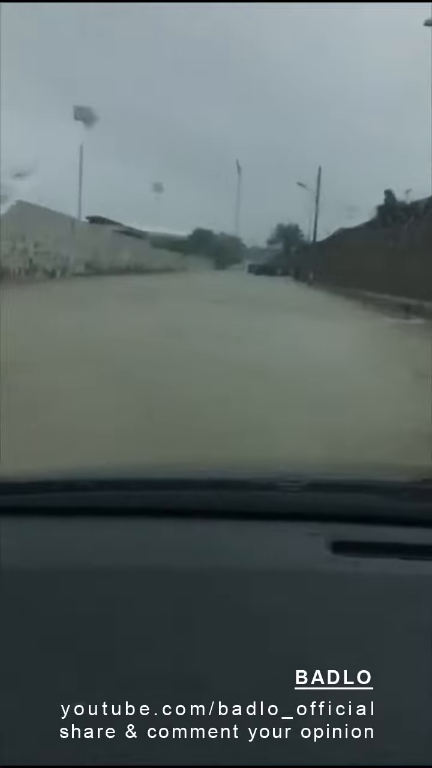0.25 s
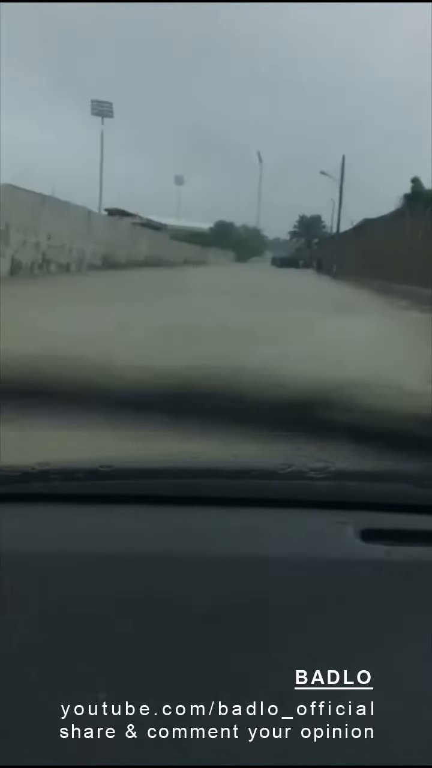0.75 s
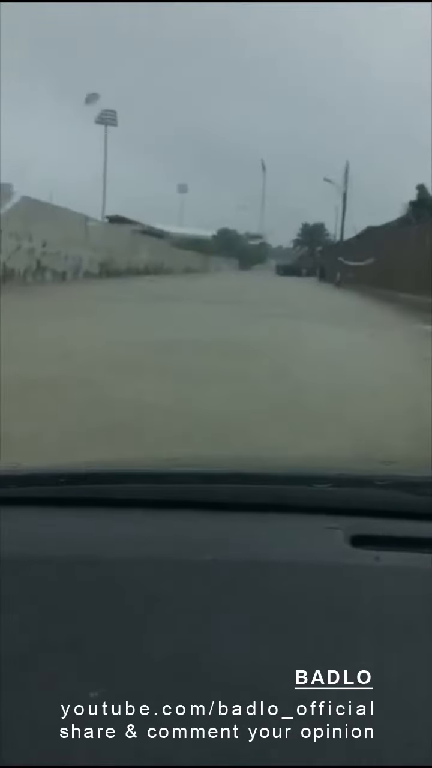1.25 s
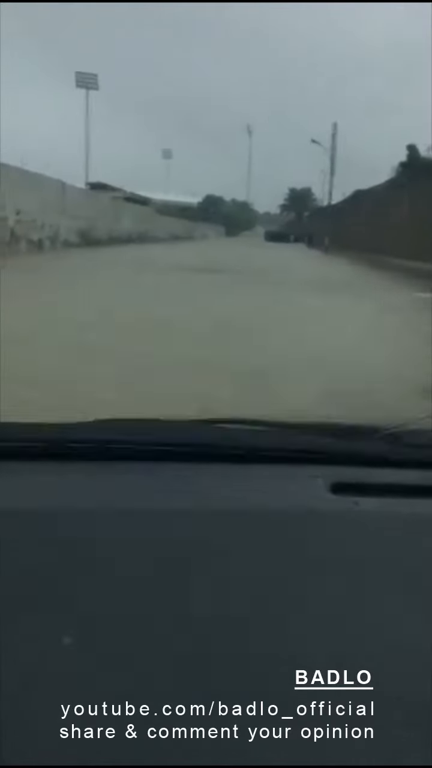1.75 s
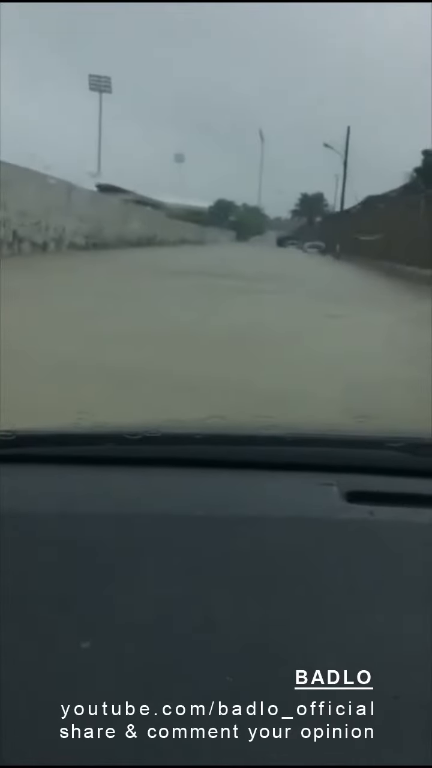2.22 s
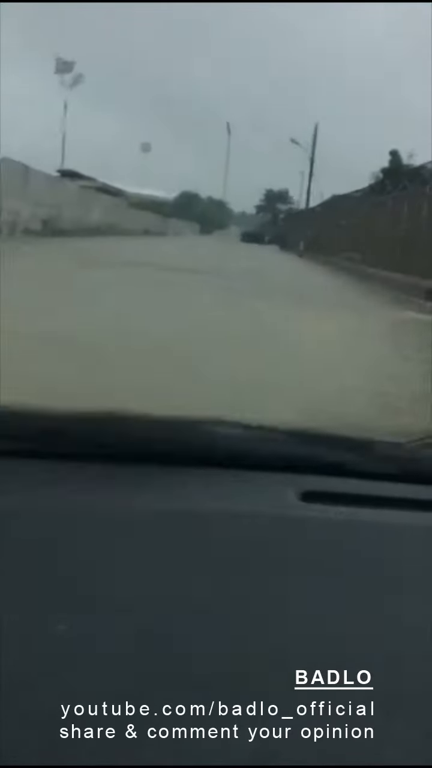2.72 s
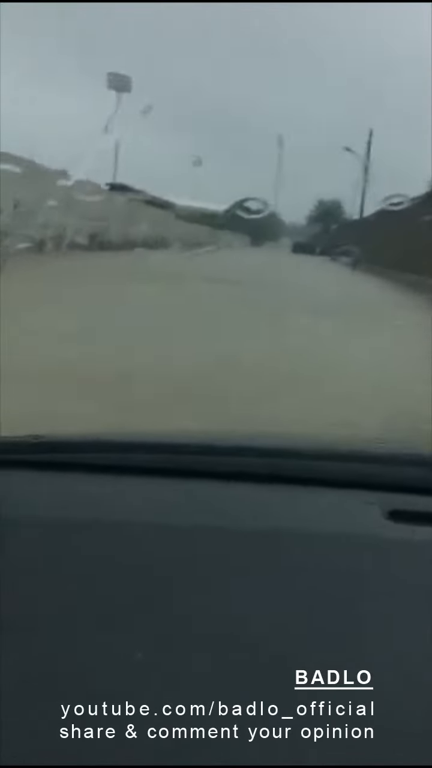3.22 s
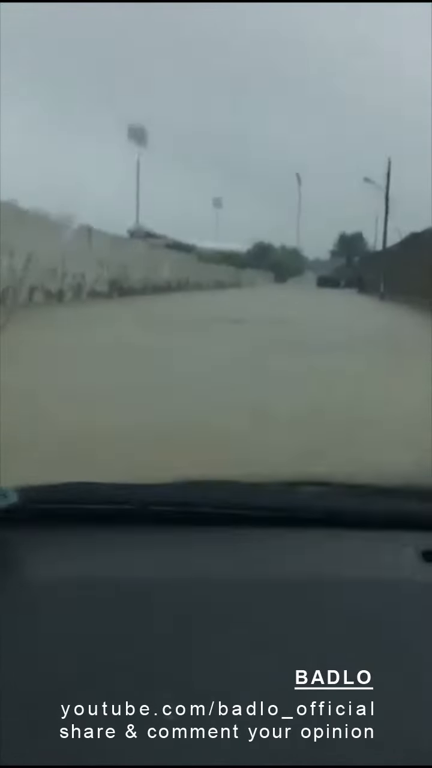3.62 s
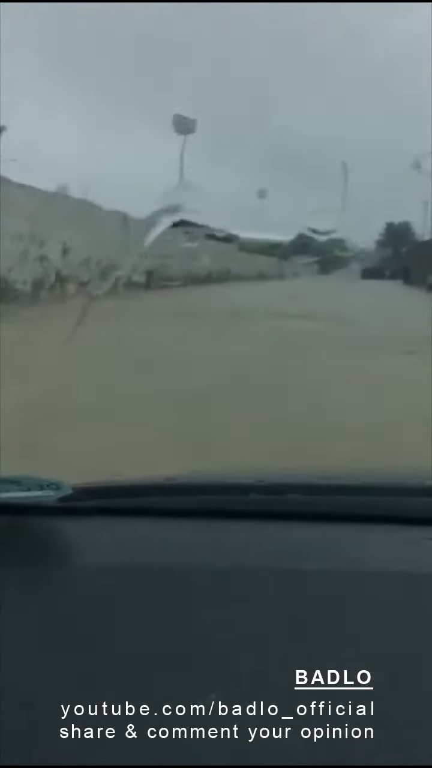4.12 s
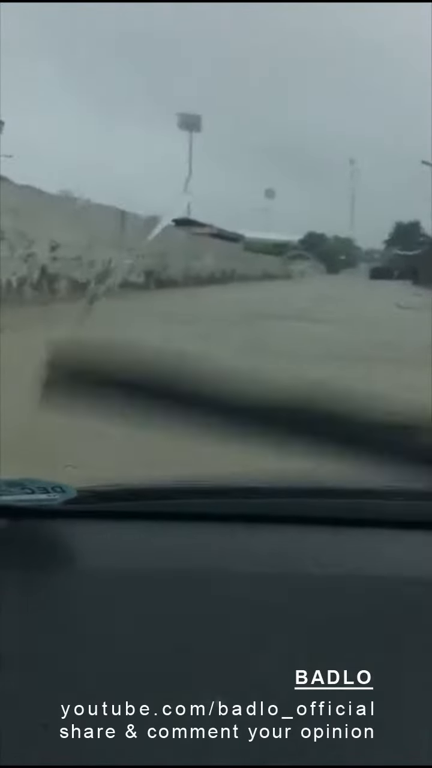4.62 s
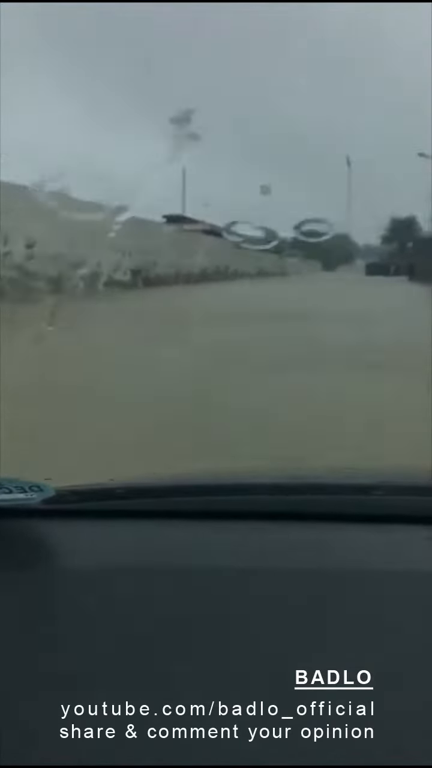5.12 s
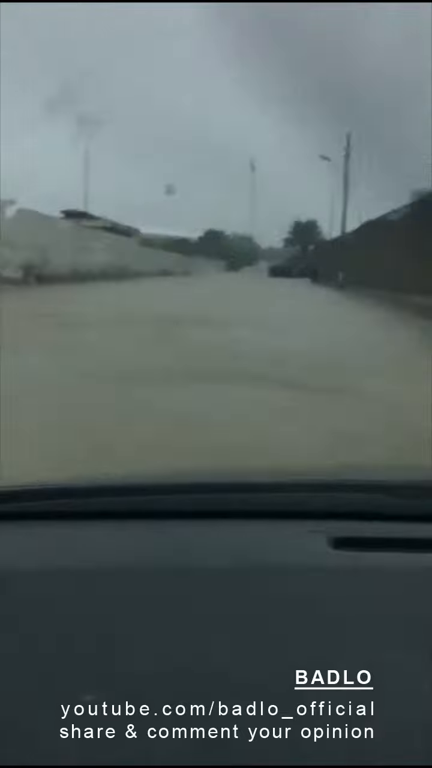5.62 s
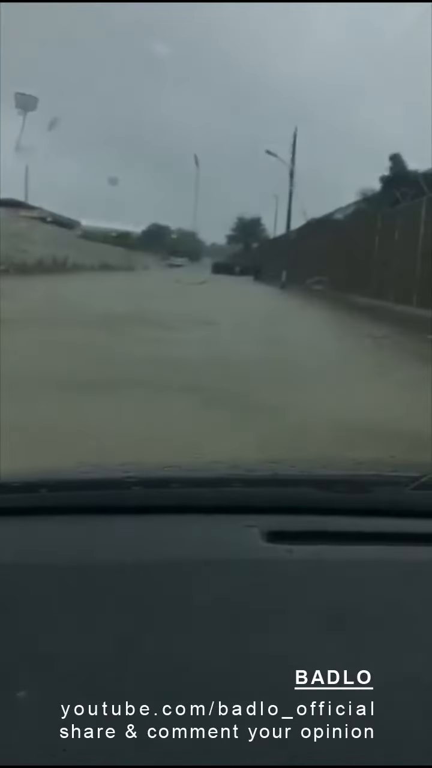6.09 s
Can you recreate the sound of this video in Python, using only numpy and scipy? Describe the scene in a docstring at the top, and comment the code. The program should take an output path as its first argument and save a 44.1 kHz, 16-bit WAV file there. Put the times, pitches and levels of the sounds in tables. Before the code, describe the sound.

Inside a car wading through floodwater: deep throbbing engine drone, rumbling, churning water, and wipers knocking and thudding about once a second in the rain.

```python
"""Inside a car that wades slowly along a flooded street in the rain.
The engine drones as a modulated harmonic tone that throbs unevenly, booms up and falls away.
Coloured noise and ringing bubbles make the water that rumbles, churns and hisses.
Short tones make low gulps of water and one bright snap; noise bursts make splashes and swells of the churn.
The wipers swish as narrow-band noise, then knock and thud as decaying modes; rain patters and ticks on the windscreen."""
import sys
import numpy as np
from scipy import signal
from scipy.fft import rfft, irfft
from scipy.io import wavfile
from scipy.ndimage import uniform_filter1d

SR = 44100
rng = np.random.default_rng(int(sys.argv[2]) if len(sys.argv) > 2 else 0)


def store_pcm(level_fs):
    """Save levels as 16-bit WAV."""
    pcm = np.round(np.clip(level_fs, -1, 1) * 32767).astype(np.int16)
    wavfile.write(sys.argv[1], SR, np.atleast_2d(pcm).T)


N = 280035
TIME = np.arange(N) / SR


def gain_of(db):
    """Decibel law: 20 dB is a factor of ten in amplitude."""
    return 10 ** (np.asarray(db) / 20)


def evened(x):
    """Normalisation to an rms of 1."""
    return x / np.sqrt(np.mean(x ** 2) + 1e-20)


def read(points, hz):
    """Interpolation of a spectrum on a logarithmic frequency axis."""
    point_hz, db = np.transpose(points)
    return np.interp(np.log(hz + 1), np.log(point_hz + 1), db)


def curve(rows):
    """Linear interpolation of a level over time."""
    return np.interp(TIME, *np.transpose(rows))


def hump(crest_s, half_s):
    """Raised-cosine envelope: 1 at the crest, 0 beyond the half-length."""
    return np.cos(np.pi / 2 * np.clip((TIME - crest_s) / half_s, -1, 1)) ** 2


def add(mix, start_s, sound):
    """Superposition of one event on the mix."""
    part = mix[max(round(start_s * SR), 0):][:len(sound)]
    part += sound[:len(part)]


def coloured(x, points):
    """Linear filtering: weights the spectrum of x by the points, at rms 1."""
    hz = np.fft.rfftfreq(len(x), 1 / SR)
    return evened(irfft(rfft(x) * gain_of(read(points, hz)), len(x)))


def wander(rate_hz):
    """Low-passed noise: a random fluctuation of rms 1 that fades out around the rate."""
    hz = np.fft.rfftfreq(N, 1 / SR)
    return evened(irfft(rfft(rng.standard_normal(N)) * np.exp(-(hz / rate_hz) ** 2), N))


def resonate(x, hz, width_hz):
    """Resonance by heterodyning: shift hz down to zero, low-pass, shift back, for a gain of about 1."""
    turn = np.exp(2j * np.pi * np.cumsum(hz * np.ones(len(x))) / SR)
    r = np.exp(-np.pi * width_hz / SR)
    return 2 * (turn * signal.lfilter([1 - r], [1, -r], x / turn)).real


def fuzzy_tone(hz, width_hz, size):
    """Narrow-band noise: white noise passed twice through one resonance, at rms 1."""
    once = resonate(rng.standard_normal(size), hz, width_hz)
    return evened(resonate(once, hz, width_hz))


def froth(points, patchy_db):
    """Time-frequency modulation: noise whose loudness shifts in short patches of time and pitch."""
    z = signal.stft(rng.standard_normal(N), nperseg=1024, noverlap=768)[2]
    patches = uniform_filter1d(rng.standard_normal(z.shape), size=6, axis=0)
    patches = uniform_filter1d(patches, size=9, axis=1)
    noise = signal.istft(z * gain_of(patchy_db * evened(patches)), nperseg=1024, noverlap=768)[1]
    return coloured(noise[:N], points)


def impacts(per_s, spread_db):
    """Random point process: clicks of either sign, most small and a few large."""
    size = gain_of(spread_db * np.minimum(rng.exponential(1, N), 4))
    return size * rng.choice([-1, 1], N) * (rng.random(N) < per_s / SR)


def bubbles(low_hz, high_hz, per_s, cycles, rise, count=24):
    """Bubble resonance: air pockets ring for a few cycles and rise in pitch as they surface."""
    out = np.zeros(N)
    for hz in np.geomspace(low_hz, high_hz, count):
        u = np.arange(int(5 * cycles * SR / hz)) * hz / SR / cycles  # time in units of the decay
        ring = np.sin(2 * np.pi * cycles * (u + rise * u ** 2))
        ring = ring * np.exp(-u) * np.minimum(u * cycles, 1)
        out += signal.oaconvolve(impacts(per_s / count, spread_db=3.5), ring)[:N]
    return out


# fine patter on the windscreen, relative spectrum: frequency_hz, density_db (dB per Hz)
GLASS_SPECTRUM = [(700, -21), (1800, 8), (2800, 3.5), (3800, 9.5), (5000, -2.5), (6500, -3), (8000, -11.5)]
# heavy drops and spatters, relative spectrum: frequency_hz, density_db (dB per Hz)
SNAP_SPECTRUM = [(700, -15), (1500, -3.5), (2200, 5), (2800, 8.5), (3800, 3.5), (5000, 0), (6500, 1.5),
                 (8000, -7)]
# water thrown on the windscreen: start_s, level_db, length_s
SPATTERS = [(0.655, -48.5, 0.046), (0.714, -56, 0.07), (3.66, -55.5, 0.2)]


def rain(patter_db=-62.5, ring_s=0.0028, grain_db=0.0):
    """Shot noise: random impacts shape fine patter, with spatters thrown over it, damped by the windscreen."""
    t = np.arange(SR // 3) / SR
    fall = np.exp(-t / ring_s)
    power = signal.oaconvolve(impacts(per_s=260, spread_db=4) ** 2, fall ** 2)[:N]
    envelope = np.sqrt(abs(power / power.mean()))
    patter = gain_of(patter_db) * envelope * coloured(rng.standard_normal(N), GLASS_SPECTRUM)
    thrown = np.zeros(N)
    for start_s, level_db, length_s in SPATTERS:
        add(thrown, start_s, gain_of(level_db) * np.exp(-(t / length_s) ** 3))
    grains = gain_of(grain_db * wander(400)) * rng.standard_normal(N)
    return patter + thrown * coloured(grains, SNAP_SPECTRUM)


# heavy drops on the windscreen: start_s, level_db
DROPS = [(.659, -42), (.675, -42), (.682, -41), (.95, -43), (.998, -41), (1.4144, -42), (1.655, -41),
         (1.928, -42), (2.49, -36.5)]


def drops(ring_s=0.0015):
    """Impulsive excitation: each heavy drop snaps as coloured noise that decays at once."""
    out, t = np.zeros(N), np.arange(SR // 40) / SR
    for start_s, level_db in DROPS:
        snap = np.exp(-t / ring_s) * coloured(rng.standard_normal(len(t)), SNAP_SPECTRUM)
        add(out, start_s - .0005, gain_of(level_db) * snap)
    return out


# scuttle panel that carries the wipers, its modes: frequency_hz, level_db (before tilt), t60_s
SCUTTLE_MODES = [(129.3, -5, 0.13), (186, -6.5, 0.11), (214, -5, 0.06), (358, -21.5, 0.03)]


def thud(soft_s, tilt_db):
    """Modal synthesis: a rubber-cushioned blow rings the scuttle; positive tilt favours its upper modes."""
    t = np.arange(SR // 4) / SR
    ring = np.zeros(len(t))
    for hz, level_db, t60_s in SCUTTLE_MODES:
        tilted_db = level_db + tilt_db * np.log2(hz / SCUTTLE_MODES[0][0])
        ring += gain_of(tilted_db - 60 * t / t60_s) * np.sin(2 * np.pi * hz * t)
    ring *= 1 - np.exp(-(t / soft_s) ** 2)
    return ring / abs(ring).max()


# wiper turns: centre_s, level_db (of the rub)
WIPES = [(0.028, -45), (.928, -45), (1.836, -44), (2.768, -43), (3.677, -48.5), (4.595, -43.5),
         (5.508, -46)]
# the wiper linkage thuds and rebounds: start_s, level_db (peak), tilt_db (dB per octave)
THUDS = [(0.065, -20.5, 3), (0.926, -20.5, -15), (1.841, -15, -24), (1.9, -21, 9.5), (2.764, -22, -18),
         (2.825, -21, 6), (3.658, -20.5, 6), (3.685, -18, -14), (4.662, -20.5, 2.5), (5.514, -16, -12),
         (5.589, -25, 11)]
SWISH_HZ, SWISH_S = 860, 0.023  # pitch at the centre and half-length of the rub at each turn


def wipers(glide_per_s=2.1, width_hz=190, upper_db=-8, chatter=0.67, scrape_db=-4):
    """Stick-slip friction: the blades rub with rising pitch, chatter and scrape; the linkage thuds."""
    out, t = np.zeros(N), np.arange(-SR // 10, SR // 10) / SR
    pitch = SWISH_HZ * (1 + glide_per_s * t)
    stroke = np.exp(-.5 * (t / SWISH_S) ** 2)
    scrape_stroke = np.exp(-.5 * ((t + 0.0082) / (2.2 * SWISH_S)) ** 2)  # longer, crests a little earlier
    for centre_s, level_db in WIPES:
        rub = fuzzy_tone(pitch, width_hz, size=len(t))
        rub = rub + gain_of(upper_db) * fuzzy_tone(pitch * 1.3, 220, size=len(t))
        slips = 1 + chatter * np.sin(2 * np.pi * (62 * t + rng.random()))  # rubber sticks and lets go
        swish = evened(rub * slips * stroke) * np.sqrt(np.mean(stroke ** 2))
        scrape = gain_of(scrape_db) * fuzzy_tone(510, 800, size=len(t)) * scrape_stroke
        heard = centre_s + t >= 0
        add(out, centre_s + t[0], gain_of(level_db) * (swish + scrape)[heard])
    for start_s, level_db, tilt_db in THUDS:
        add(out, start_s, gain_of(level_db) * thud(soft_s=0.013, tilt_db=tilt_db))
    return out


# the blades knock on the glass, often in quick succession: start_s, level_db (peak), pitch_hz
KNOCKS = [(.03, -42, 896), (.911, -34.5, 773), (0.937, -37, 913), (1.817, -30, 824), (1.838, -38, 900),
          (2.755, -34, 850), (2.763, -32.5, 865), (2.777, -36, 804), (3.655, -34, 870), (3.679, -36, 800),
          (4.566, -35, 917), (4.589, -34, 850), (4.596, -28.5, 850), (5.5, -36, 894), (5.511, -33, 910)]
# ring of blade and arm: ratio (multiple of the pitch), level_db, t60_s
BLADE_MODES = [(.46, -4.5, 0.05), (.78, -10, .04), (1, -1.5, 0.06), (1.349, -12.5, .05)]


def blades(soft_s=.0027, rough=.06, slip_hz=220):
    """Modal ringing with frequency modulation: blades knock, roughened by the wet rubber slipping."""
    out, t = np.zeros(N), np.arange(SR // 10) / SR
    slip = wander(slip_hz)
    for start_s, level_db, pitch_hz in KNOCKS:
        slip_here = slip[round(start_s * SR):][:len(t)]
        turns = np.cumsum(pitch_hz * (1 + rough * slip_here)) / SR
        ring = np.zeros(len(t))
        for ratio, mode_db, t60_s in BLADE_MODES:
            mode = np.sin(2 * np.pi * (ratio * turns + rng.random()))
            ring += gain_of(mode_db - 60 * t / t60_s) * mode
        ring *= 1 - np.exp(-(t / soft_s) ** 2)
        add(out, start_s, gain_of(level_db) * ring / abs(ring).max())
    return out


# splashes and short swells of the churning water:
# start_s, level_db (at the crest), pitch_hz, length_s (pi times the rise to the crest)
SPLASHES = [(.04, -43.5, 378, 0.031), (.658, -44.5, 1590, 0.024), (0.687, -45, 2200, 0.012),
            (.925, -44.5, 328, .08), (1.13, -42, 291, 0.046), (1.397, -47.5, 2020, 0.043),
            (1.425, -33.5, 180, 0.17), (1.465, -46, 586, .05), (3.085, -46.5, 550, 0.065),
            (3.267, -46, 720, 0.011), (3.65, -42, 560, .1), (4.08, -43, 328, 0.047), (4.63, -28, 157, 0.11),
            (4.74, -31, 122, .12), (5.063, -45, 910, .041), (5.08, -40.5, 310, 0.057),
            (5.545, -42, 408, 0.083), (6.04, -40.5, 377, 0.086), (6.133, -46, 1890, .028),
            (6.199, -39, 340, 0.058)]


def splashes(width=0.38):
    """Narrow-band noise bursts: splashes and short swells of the churning water, each around its own pitch."""
    out, t = np.zeros(N), np.arange(SR // 4) / SR
    for start_s, level_db, pitch_hz, length_s in SPLASHES:
        u = np.pi * t / length_s
        burst = fuzzy_tone(pitch_hz, width * pitch_hz, size=len(t)) * u * np.exp(1 - u)
        add(out, start_s, gain_of(level_db) * burst)
    return out


# low gulps of water, and one bright snap at 0.659 s:
# crest_s, level_db (peak), pitch_hz (at the crest), half_length_s, glide (octaves per s)
GULPS_AND_SNAP = [(.05, -22.5, 97, 0.065, 0), (.2, -32, 189.4, 0.067, -1), (0.584, -31.5, 284, 0.045, -4),
                  (0.659, -36.5, 1780, .005, 4), (.685, -26.5, 177.6, .05, -3.5),
                  (0.845, -19, 71.2, 0.042, 1.5), (1.45, -31.5, 208.4, .07, 1.5),
                  (1.551, -23.5, 79, .05, 0), (2.03, -25.5, 79.3, 0.102, 2), (2.42, -28.5, 192, .06, -0.5),
                  (2.65, -32, 190.7, .07, 2), (2.84, -25, 102.3, .05, 0.5), (3.273, -20.5, 69.4, 0.059, 0),
                  (3.71, -18, 66.6, .045, 1), (4.585, -32, 283, .035, 0), (5.03, -28, 129, .08, 1),
                  (6.02, -21.5, 125.4, 0.052, 1)]


def gulps_and_snap():
    """Enveloped sine tones with exponential pitch glide: low gulps of water and one bright snap."""
    out = np.zeros(N)
    for crest_s, level_db, pitch_hz, half_s, glide in GULPS_AND_SNAP:
        t = np.arange(-half_s, half_s, 1 / SR)
        turns = np.cumsum(pitch_hz * 2 ** (glide * t)) / SR + rng.random()
        note = np.cos(np.pi / 2 * t / half_s) ** 2 * np.sin(2 * np.pi * turns)
        add(out, crest_s - half_s, gain_of(level_db) * note)
    return out


# bow wave before its random lapping: time_s, height_db
WAVE = [(0, 3), (.35, -5.5), (.65, 1.5), (1.7, -1.8), (2.55, -4), (3.4, -0.2), (4.7, 2), (4.95, 0),
        (5.3, 3.5), (6.35, 1.7)]
# relative spectra of the water as heard in the cabin: frequency_hz, density_db (dB per Hz)
RUMBLE_SPECTRUM = [(18, -35), (28, -16), (36, 4), (48, -0.5), (72, 3.5), (100, -2), (130, -7.5), (150, -9),
                   (190, -7.5), (250, -22.5), (400, -69)]
UNDERFLOOR_SPECTRUM = [(35, -13.5), (70, 0), (130, -3.5), (190, -5.5), (270, -23), (600, -47.5)]
CHURN_SPECTRUM = [(90, -14.5), (190, 4.5), (290, 1), (335, -1.5), (390, 0), (470, -5), (590, -2),
                  (770, -10), (1100, -15.5), (1600, -23), (3500, -56)]
SPRAY_SPECTRUM = [(400, -11), (900, 2.5), (1200, 3), (1500, 0), (2000, 2), (2400, -1.5), (2800, -5.5),
                  (3400, -5), (4500, -13), (5000, -21), (8000, -36.5)]
HISS_SPECTRUM = [(1500, -3.5), (3200, 0), (4500, -0.5), (4950, -4), (5600, -2.5), (6800, -6.5), (8000, -14)]  # thin hiss along the sides
# water layers: level_db at zero wave height, dB gained per dB of wave height
RUMBLE_LAW, CHURN_LAW, SPRAY_LAW, HISS_LAW = (-27, 0.29), (-41.5, 0.47), (-50, .15), (-56.5, 0.093)
SETTLE_S, SETTLE_DB_PER_S = 4.7, 0.8  # from here on, spray and hiss die down


def flood(glug_db=-8, gurgle_db=-4, fizz_db=-7, lap_db=0.23, sheets_db=0.76, gust_db=0.34, heave_db=0.6):
    """Turbulence and bubble noise: the bow wave shakes the floor, churns in the wheel wells and sprays."""
    height_db = curve(WAVE) + lap_db * wander(9.5)

    # big air pockets under the floor
    glugs = bubbles(low_hz=66.4, high_hz=235.6, per_s=45, cycles=6.07, rise=0.015)
    glugs = coloured(glugs, UNDERFLOOR_SPECTRUM)
    heave = gain_of(heave_db * wander(3.9))
    rumble = coloured(rng.standard_normal(N), RUMBLE_SPECTRUM) + gain_of(glug_db) * glugs
    rumble = evened(heave * rumble)

    gurgle = bubbles(low_hz=222.3, high_hz=1683, per_s=260, cycles=4.85, rise=0.029)
    gurgle = coloured(gurgle, CHURN_SPECTRUM)
    churn = froth(CHURN_SPECTRUM, patchy_db=0.4) + gain_of(gurgle_db) * gurgle

    fizz = bubbles(low_hz=924, high_hz=4500, per_s=350, cycles=9.8, rise=0.0056)
    fizz = coloured(fizz, SPRAY_SPECTRUM)
    spray = froth(SPRAY_SPECTRUM, patchy_db=1.5) + gain_of(fizz_db) * fizz
    hiss = froth(HISS_SPECTRUM, patchy_db=2.0)

    layers = [(rumble, RUMBLE_LAW), (churn, CHURN_LAW), (spray, SPRAY_LAW), (hiss, HISS_LAW)]
    rumble, churn, spray, hiss = (part * gain_of(db + follow * height_db) for part, (db, follow) in layers)
    sheets = sheets_db * wander(52) + gust_db * wander(7)  # spray lands in uneven sheets
    settling = SETTLE_DB_PER_S * np.maximum(TIME - SETTLE_S, 0)
    return rumble + churn + gain_of(sheets - settling) * (spray + hiss)


# engine effort: time_s, level_db (of the drone, before its offset, throb, booms and lulls)
LOAD = [(0, -22.5), (.5, -27), (1.15, -26), (1.43, -36), (1.7, -26.5), (1.85, -29), (2.3, -27), (2.9, -26),
        (3.5, -27), (4.1, -26), (4.6, -25.5), (5.5, -23), (6.35, -23.5)]
# the drone booms up: crest_s, level_db (drawn to at the crest), half_length_s
BOOMS = [(0.037, -18, 0.09), (0.23, -18.5, 0.08), (0.34, -20, .11), (0.588, -19.5, 0.05),
         (0.74, -21.5, 0.057), (0.918, -22.5, 0.076), (1.216, -21, 0.089), (1.629, -21.5, .06),
         (2.768, -18, 0.04), (3.37, -19, 0.075), (3.869, -18.5, 0.072), (4.177, -19, 0.068),
         (4.295, -20.5, 0.052), (4.426, -19, 0.078), (4.731, -20.5, 0.054), (4.831, -20, 0.046),
         (5.177, -21.5, 0.068), (5.276, -18, 0.051), (5.585, -18.5, 0.11), (5.83, -18.5, .06),
         (6.199, -18.5, 0.16)]
# the drone falls away: centre_s, half_length_s
LULLS = [(.18, 0.031), (0.457, 0.054), (0.809, .04), (1.031, 0.069), (1.124, .03), (1.797, .04),
         (1.941, .05), (2.051, .04), (2.249, 0.043), (2.528, .04), (2.659, .05), (2.83, 0.033),
         (3.199, .04), (3.559, .06), (3.75, 0.043), (3.985, .04), (4.228, 0.015), (4.351, 0.028),
         (4.506, .03), (4.967, .03), (5.064, .04), (5.41, .04), (5.763, .035), (5.988, 0.027)]
LULL_DB = -16  # gain at the centre of a lull
FIRING_HZ, CRUISE_DB, HZ_PER_DB = 48.14, -24, 0.27  # the firing rate rises a little with the drone level
# the drone throbs unevenly: mean rate, depth as a fraction
THROB_PER_S, THROB_DEPTH = 6.5, 0.45


def engine(drone_db=-2, rough=0.18, judder_hz=2.2, drift_hz=1.5, second_db=-16, third_db=-22, fourth_db=-21):
    """Harmonic synthesis with amplitude modulation: a throbbing drone at the firing rate, weak overtones."""
    throbs = np.cumsum(THROB_PER_S * (1 + .45 * wander(4.93))) / SR + rng.random()
    throb = abs(1 + THROB_DEPTH * np.exp(2j * np.pi * throbs))  # round swells, sharp dips
    drone = gain_of(curve(LOAD) + drone_db) * throb
    for crest_s, level_db, half_s in BOOMS:
        drone = drone + hump(crest_s, half_s) * (gain_of(level_db) - drone)
    for centre_s, half_s in LULLS:
        drone = drone * gain_of(LULL_DB * hump(centre_s, half_s))

    # the pitch is steadier when the drone is strong and judders more when it drops
    effort_db = 20 * np.log10(drone) - CRUISE_DB
    slack = np.clip(gain_of(-.6 * effort_db), .3, 3)
    hz = FIRING_HZ + HZ_PER_DB * effort_db + drift_hz * wander(2.5) + judder_hz * slack * wander(11.59)
    turns = np.cumsum(hz) / SR
    out = (1 + rough * wander(30)) * np.sin(2 * np.pi * turns)
    for k, db in enumerate([second_db, third_db, fourth_db], 2):
        overtone = np.sin(2 * np.pi * (k * turns + rng.random()))
        out += gain_of(db) * (1 + 0.5 * wander(13)) * overtone
    return drone * evened(out)


def scene():
    """Linear superposition of all the sources as they reach the dashboard."""
    weather = rain() + drops()
    wiping = wipers() + blades()
    water = splashes() + gulps_and_snap() + flood()
    return (weather + wiping + water + engine())[None]


EDGE_HZ = 8170  # upper band limit


def record(dry):
    """Band limiting: the microphone sheds the deepest bass, the ends fade, and a low-pass cuts the top."""
    thin = signal.sosfilt(signal.butter(2, 20, "highpass", fs=SR, output="sos"), dry)
    thin = thin * signal.windows.tukey(N, .001)
    low_pass = signal.firwin(1023, EDGE_HZ, window=("kaiser", 9), fs=SR)
    return signal.oaconvolve(thin, low_pass[None], "same")


dry = scene()
out = record(dry)
store_pcm(out)
```